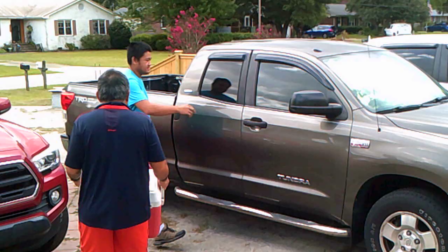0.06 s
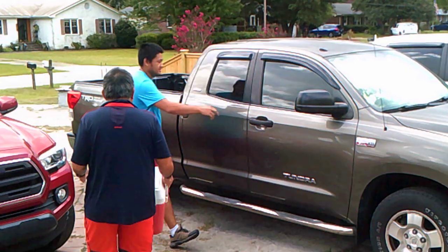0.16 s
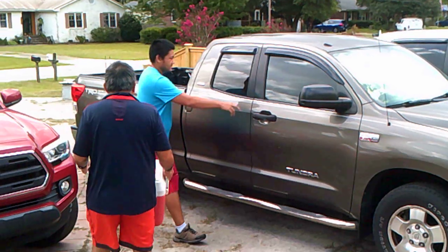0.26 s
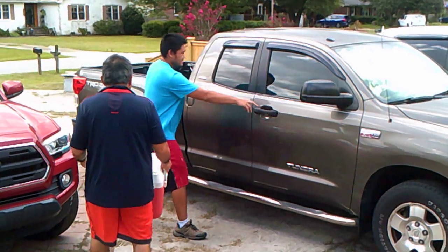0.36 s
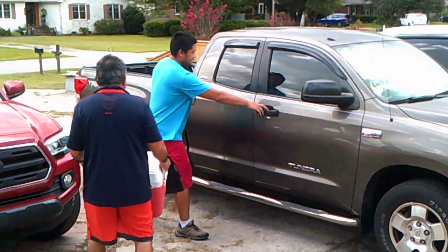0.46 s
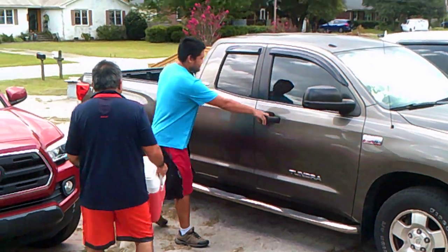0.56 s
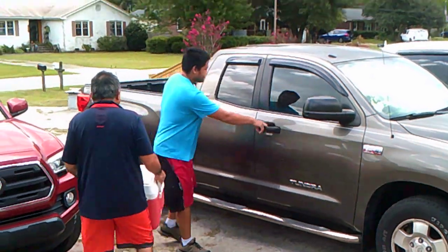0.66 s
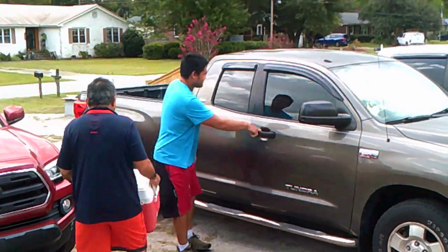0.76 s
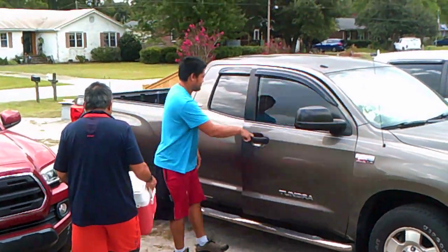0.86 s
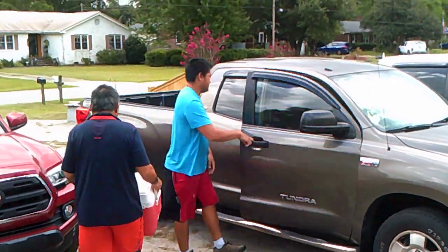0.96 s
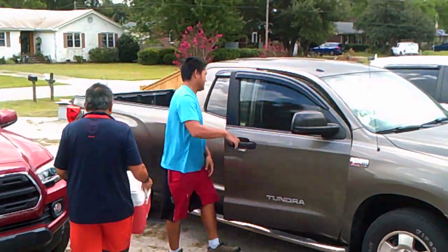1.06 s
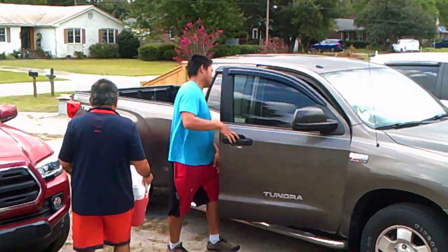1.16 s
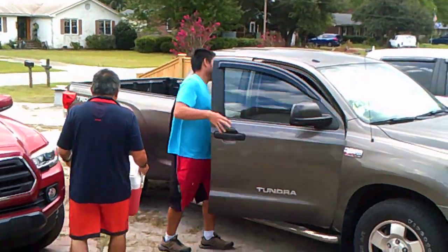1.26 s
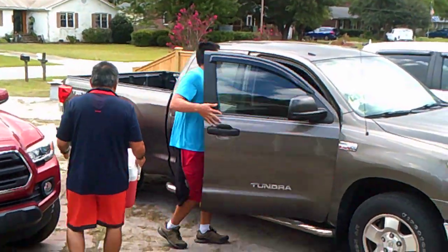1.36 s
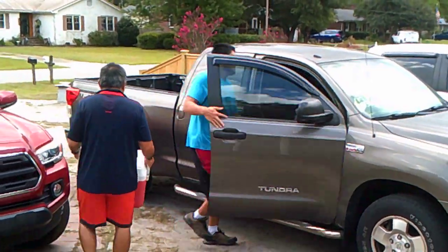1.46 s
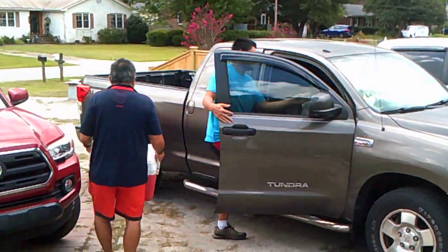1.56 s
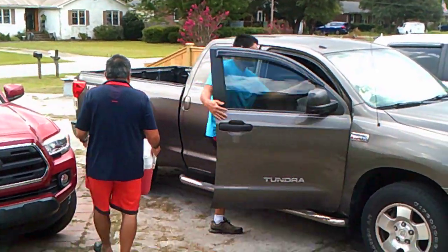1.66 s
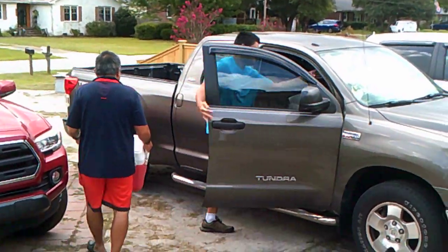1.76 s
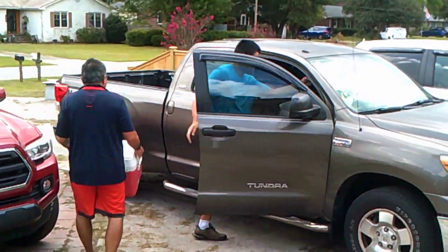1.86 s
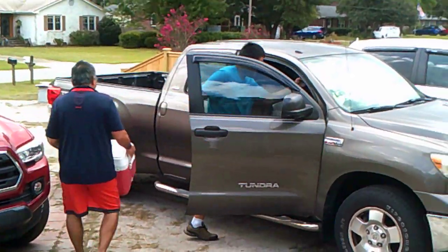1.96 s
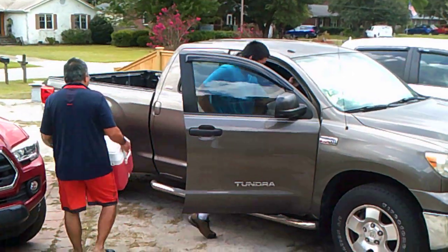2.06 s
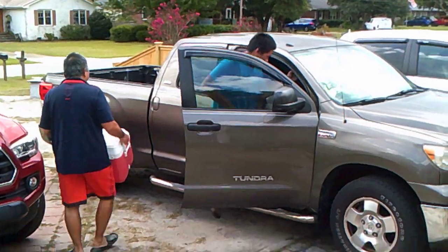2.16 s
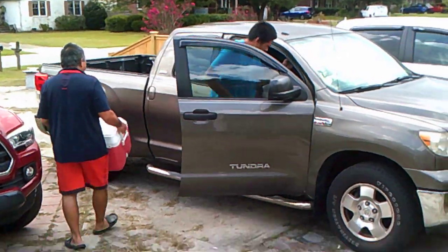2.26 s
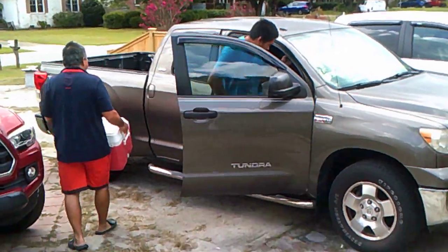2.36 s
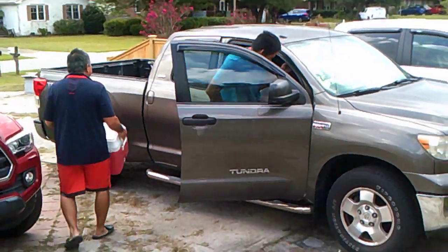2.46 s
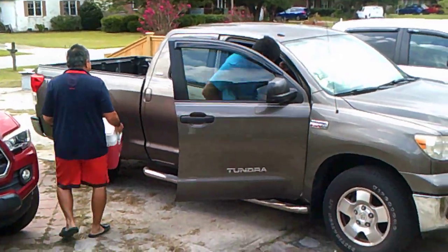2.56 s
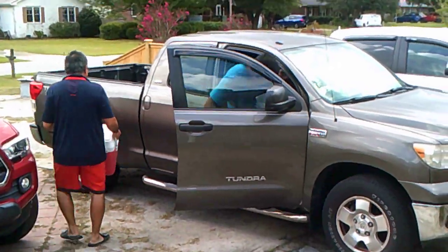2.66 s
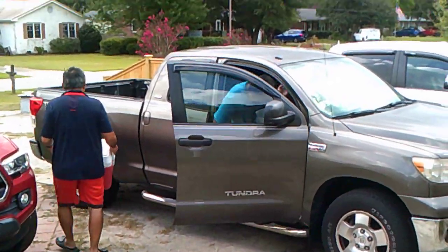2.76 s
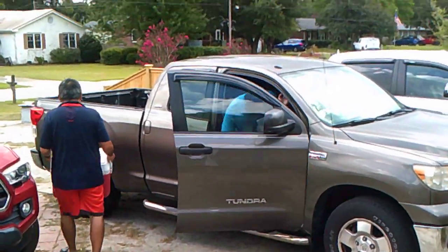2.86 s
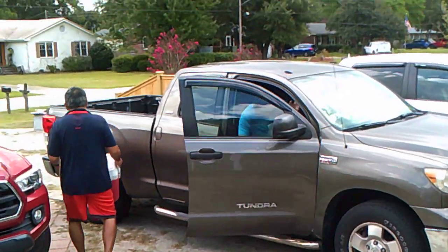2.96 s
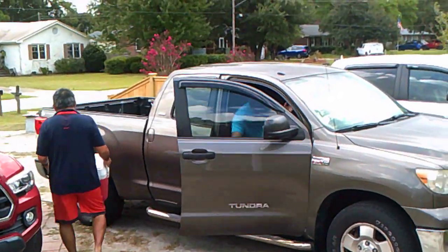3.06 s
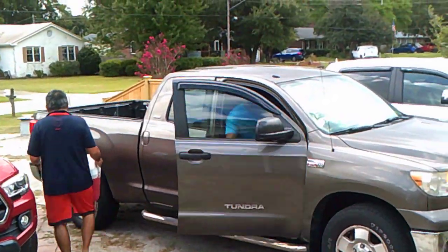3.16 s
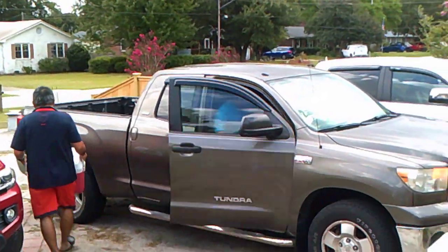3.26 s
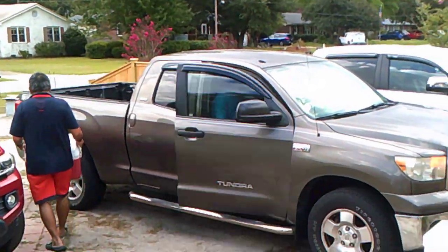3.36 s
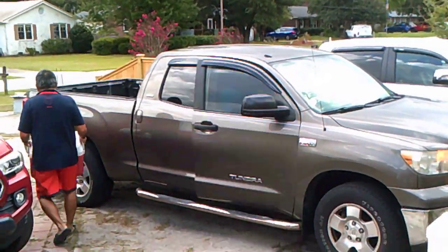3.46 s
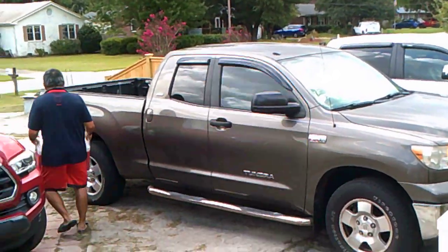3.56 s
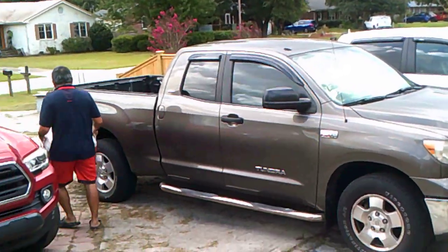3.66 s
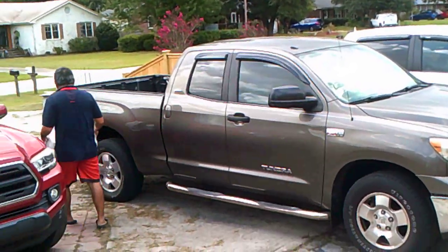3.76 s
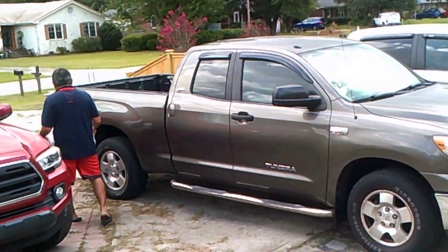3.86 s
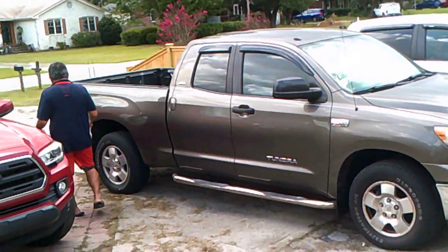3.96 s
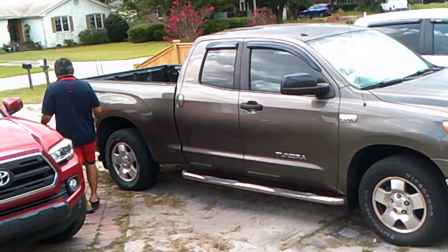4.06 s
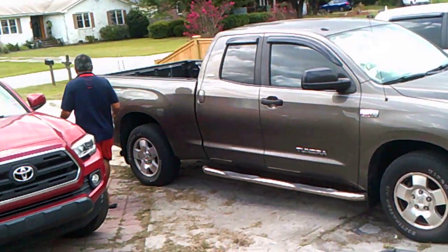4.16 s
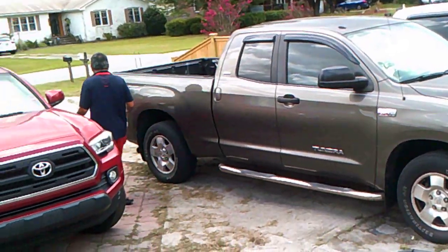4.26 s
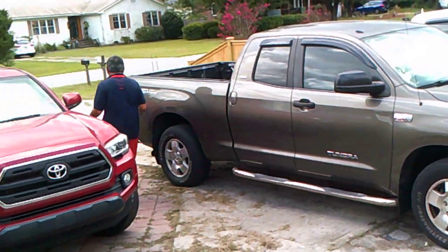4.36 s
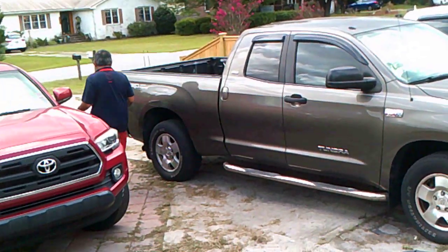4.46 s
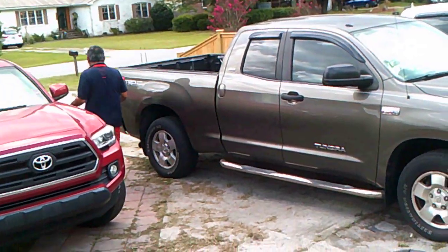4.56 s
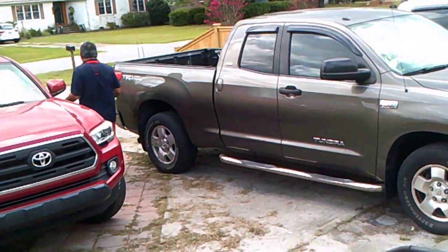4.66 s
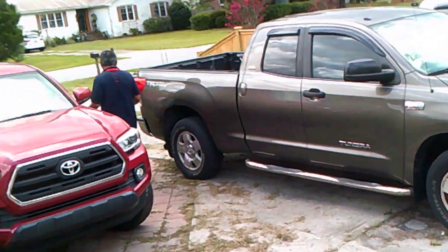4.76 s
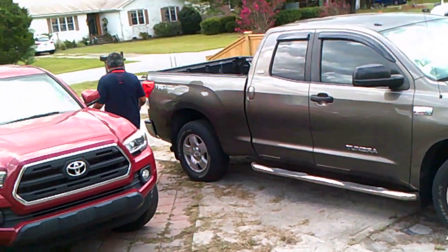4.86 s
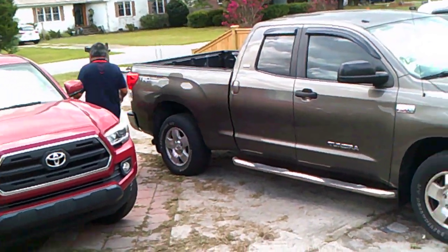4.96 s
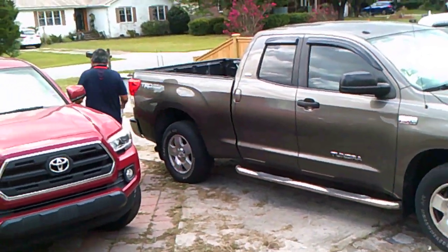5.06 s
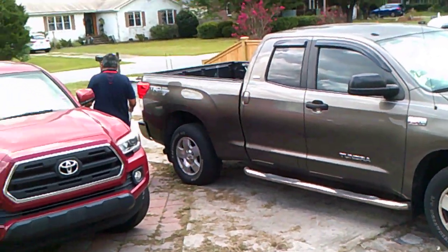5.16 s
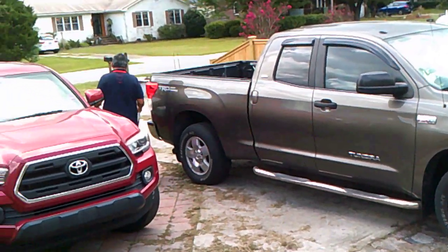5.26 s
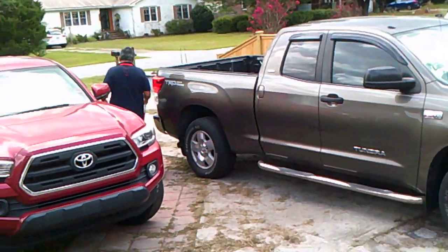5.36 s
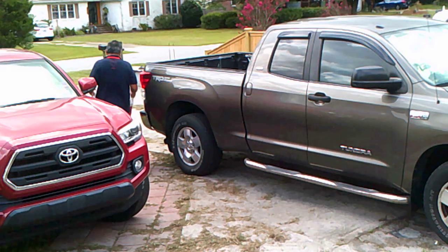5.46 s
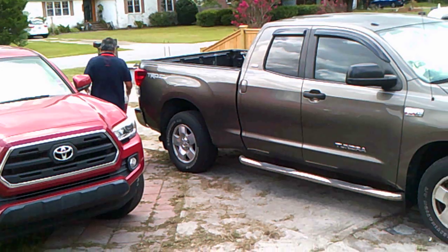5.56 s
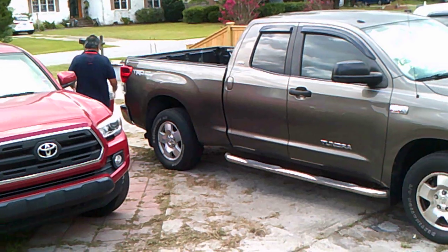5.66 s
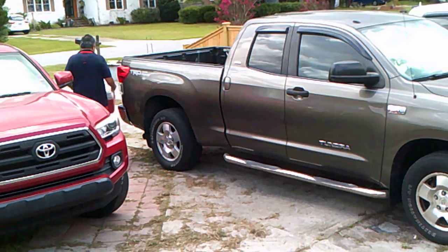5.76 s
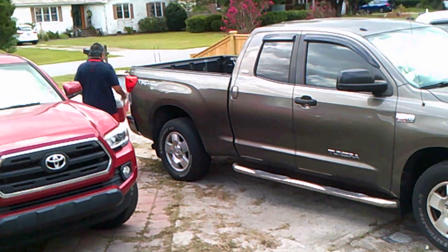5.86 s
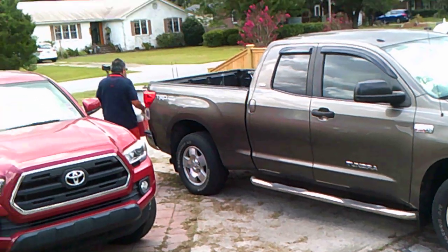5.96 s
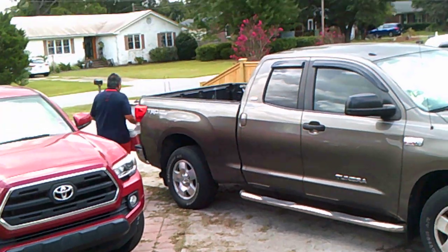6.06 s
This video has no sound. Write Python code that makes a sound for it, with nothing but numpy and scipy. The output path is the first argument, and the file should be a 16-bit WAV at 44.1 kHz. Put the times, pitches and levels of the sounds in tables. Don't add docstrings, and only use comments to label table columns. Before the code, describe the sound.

On an outdoor driveway, a truck's rear door shuts at once with a firm, hollow thump. A handle clacks lightly, then the front latch snaps open, harsh and loud. Small knocks and a bright strap click follow as someone climbs in. A heavy, overloaded slam booms through the cab. Soft scuffs and steady street hiss with insects remain, caught dully by a small camera microphone.

```python
import sys
import numpy as np
from scipy import signal
from scipy.io import wavfile
from scipy.ndimage import uniform_filter1d

SR = 44100
rng = np.random.default_rng(int(sys.argv[2]) if len(sys.argv) > 2 else 0)


def store_pcm(level_fs):
    pcm = np.round(np.clip(level_fs, -1, 1) * 32767).astype(np.int16)
    wavfile.write(sys.argv[1], SR, np.atleast_2d(pcm).T)


def invert_db(x):
    u = np.asarray(x, float) / 20
    return 10 ** u


N = 269451

# start in seconds, peak in dB, treble tilt in dB per octave,
# ring t60 in seconds at 1 kHz, snap of steel on steel in dB.
REAR_KNOCKS = [
    (.085, -14.5, -5, 0.092, -50),
    (.102, -5.5, -2.5, 0.049, -36),
    (.109, -1.5, 1.5, 0.03, -18.5),
    (.113, -19.5, -3.5, 0.062, -26),
    (.131, -8.5, -2.5, 0.15, -48.5),
    (.218, -25, -3, 0.044, -48),
]
HANDLE_KNOCKS = [
    (.636, -22, 1, 0.042, -52),
    (.655, -20, -3.5, 0.05, -52),
    (.6635, -8.5, -0.5, 0.076, -46),
    (.67, -11, -2.5, 0.13, -44.5),
    (.684, -14, 1, .1, -54.5),
    (.705, -19.5, 0, 0.11, -55),
    (.778, -31, -5, .04, -31),
]
LATCH_KNOCKS = [
    (1.1524, 3, 1, 0.05, 2),
    (1.1588, 3, 3.5, 0.05, 2),
    (1.1645, -0.5, 0, 0.1, -7),
    (1.1785, -6, -2.5, .1, -22),
    (1.191, -9.5, 0, 0.18, -51.5),
    (1.208, -19.5, -18, 0.24, -42),
]
SEAT_KNOCKS = [
    (1.965, -17, -2, 0.13, -49),
    (2.405, -15, 2.5, 0.061, -29),
    (2.413, -13.5, 8, 0.036, -28),
    (2.418, -10, 19.5, 0.095, -22.5),
    (2.855, -32, -5, 0.044, -48),
    (2.873, -12.5, 6.5, 0.14, -32),
    (2.888, -16, 9, 0.076, -37),
    (2.9, -20.5, -4, 0.079, -34),
]
SLAM_KNOCKS = [
    (3.502, -12.5, -3.5, .06, -41),
    (3.513, -2.5, -4, 0.11, -31.5),
    (3.525, 2.5, -2.5, 0.089, -7.5),
    (3.543, 5, -0.5, .05, -8.5),
    (3.573, -1.5, -2, 0.06, -12),
    (3.5785, 4, 1.5, 0.04, -6),
    (3.594, -7, -2.5, 0.15, -17.5),
    (3.625, -17.5, -8.5, 0.083, -39),
    (3.647, -15.5, -5, 0.075, -46),
]
# frequency in Hz, density in dB per Hz.
DOOR_SKIN = [(60, -21.5), (200, -8), (400, -11.5), (750, -7), (1100, -5), (1500, -2), (2100, -15.5),
             (3300, -39.5)]
# frequency in Hz, level in dB, t60 in seconds.
DOOR_DRUM = [(147.4, -14, 0.36), (192, -22.5, 0.23), (112, -30, 0.33)]
DOOR_FRAME = [(102.3, -11, 0.5), (264, -14.5, 0.32), (346.5, -12.5, 0.25), (477, -17.5, 0.33)]
LATCH_STEEL = [(3100, -5, .007), (3700, -2, .007), (4200, 0, .006), (4800, -2, .005)]
# frequency in Hz, t60 in seconds.
REAR_AIR = [(20.3, .187), (24.9, .9), (42.3, .355)]
FRONT_AIR = [(23, .153), (31, .325), (43.4, .43)]
# start in seconds, signed pressure on each of the three modes.
REAR_PUSH = [
    (.1008, -1.77, 1.73, .13),
    (.1397, 2.08, -1.62, -.55),
]
FRONT_PUSH = [
    (3.5131, -2.65, 5.3, -.11),
    (3.5551, 9, 2.54, -.75),
]
# start in seconds, level in dB, frequency in Hz, t60 in seconds.
CHECK_STRAP = [(2.418, -35, 481, 2.1)]
# centre in seconds, half length in seconds, level in dB.
SCUFFS = [(.21, .08, -51.5), (0.637, 0.056, -49.5), (0.803, 0.046, -52.5), (0.918, .07, -46.5),
          (2.501, 0.13, -55.5), (2.623, 0.095, -50), (2.818, 0.036, -51.5), (3.726, .035, -50.5),
          (3.963, 0.067, -52), (4.047, 0.047, -49), (4.143, 0.026, -46.5), (4.296, 0.076, -58),
          (5.947, 0.15, -61)]
# frequency in Hz, density in dB per Hz.
GRIT = [(900, -31), (1500, -10.5), (2300, -8), (3050, -18), (3750, -25.5), (4200, -45), (5000, -50.5),
        (5500, -62)]
RUMBLE = [(5.9, -34), (10, -1.5), (21, -4), (36, 1), (46, -7), (70, -16.5), (104, -12.5), (140, -30.5),
          (180, -53), (310, -120)]
STREET = [(60, -12), (90, -4.5), (130, -11), (170, -6), (210, -13.5), (250, -8.5), (360, -18.5), (750, -14),
          (1300, -13), (1800, -14), (2400, -28.5), (3050, -42.5), (4000, -56), (5000, -85)]
# time in seconds, level in dB.
BREEZE = [(0, -23), (1.8, -22), (2.4, -26.5), (3.5, -27), (4.3, -37), (5.7, -36.5), (6.11, -29.5)]
# centre in seconds, half length in seconds, change in dB.
GUSTS = [
    (.37, 0.093, 2.5),
    (.6, .07, -4),
    (.76, 0.054, 6),
    (2.92, .1, 4),
    (3.68, .08, 8),
]
# time in seconds, centre frequency in Hz.
CHORUS = [(0.0, 1746), (0.68, 1613), (1.0, 1570), (1.34, 1542), (1.72, 1658), (3.05, 1678), (3.56, 1580),
          (4.93, 1704), (6.11, 1663)]
# centre in seconds, half length in seconds, rise in dB.
SWELLS = [(.1, 0.078, 4), (.44, 0.12, 1), (.88, 0.15, 6), (2.45, 0.31, 4.5), (2.92, .13, 4.5),
          (3.45, 0.12, 4.5), (4, 0.12, 3.5), (4.8, 0.45, -0.5)]
# frequency in Hz, width in Hz, level in dB, time in seconds when it is uncovered.
MACHINE = [(26.7, 0.62, -37.5, 4.4), (40.3, 0.91, -38, 2.9), (52.94, 0.59, -33, 3.6),
           (904, 3.6, -43.5, 3.4), (248.2, 15, -49, 1.7)]
# frequency in Hz, gain in dB.
SMOOTHING = [(0, 1.5), (1500, 0), (3000, -9.5), (4200, -18.5), (4900, -44), (5300, -57.5), (5800, -44),
             (6600, -26), (7600, -34.5), (8200, -53.5), (8800, -87), (11025, -120), (22050, -120)]

SHUFFLE_DB = -59
STREET_DB, CHORUS_DB = -30, -37.5
SHARED_SWELL = .2
FULL_SCALE, HEADROOM = .707, .712
STEP = 4


def knocks(rows, boom_db, drum=DOOR_DRUM, count=56):
    out = np.zeros(N)
    t = np.arange(SR // 4) / SR
    for s, db, tilt_db, t60, snap_db in rows:
        place, sign = rng.random((2, count))
        hz = 150 + 3100 * ((np.arange(count) + place) / count) ** 1.3
        mode_db = outdoors(DOOR_SKIN, hz) + tilt_db * np.log2(hz / 1000)
        gain = invert_db(mode_db) * np.sign(sign - .5)
        mode_t60 = t60 * (1000 / hz) ** 0.66
        modes = invert_db(-60 * t[:, None] / mode_t60) * np.sin(2 * np.pi * hz * t[:, None])
        skin = modes @ gain
        boom = invert_db(boom_db) * ring(drum, t)
        add(out, s, invert_db(db) * (skin / abs(skin).max() + boom))
        add(out, s, invert_db(snap_db) * ring(LATCH_STEEL, t))
    return out


def cab_air(modes, pushes):
    out = np.zeros(N)
    t = np.arange(SR)[:, None] / SR
    hz, t60 = np.transpose(modes)
    ringing = invert_db(-60 * t / t60) * np.sin(2 * np.pi * hz * t)
    for s, *push in pushes:
        add(out, s, ringing @ push)
    return out


def strap():
    out = np.zeros(N)
    t = np.arange(SR) / SR
    for s, db, hz, t60 in CHECK_STRAP:
        add(out, s, ring([(hz, db, t60)], t))
    return out


def grit():
    grain_db = 2.3 * np.minimum(rng.exponential(1, N // 40 + 1), 4)
    grains = invert_db(grain_db).repeat(40)[:N]
    rustle = noise(GRIT, patchy_db=2, flicker_db=1.5, size=256)
    crackle = evened(rustle * uniform_filter1d(grains, size=30))
    scuffing = bumps([(s, half, invert_db(db)) for s, half, db in SCUFFS])
    return invert_db(9.5) * (invert_db(SHUFFLE_DB) + scuffing) * crackle


def wind_rumble():
    breeze_db = np.interp(np.arange(N) / SR, *np.transpose(BREEZE))
    eddies = noise(RUMBLE, patchy_db=-1.0, flicker_db=3.0, size=4096)
    return invert_db(2.5 + breeze_db + bumps(GUSTS)) * eddies


def insects():
    hz = np.interp(np.arange(N) / SR, *np.transpose(CHORUS))
    throb = invert_db(1.4 * evened(uniform_filter1d(rng.standard_normal(N), size=900)))
    band = resonate(resonate(rng.standard_normal(N), hz, 180), hz, 270)
    return invert_db(CHORUS_DB + bumps(SWELLS)) * evened(band * throb)


def street_hiss():
    hiss = noise(STREET, patchy_db=1.2, flicker_db=0.74, size=1024)
    return invert_db(STREET_DB + SHARED_SWELL * bumps(SWELLS)) * hiss


def machine():
    t = np.arange(N) / SR
    out = np.zeros(N)
    for hz, width, db, s in MACHINE:
        line = evened(resonate(rng.standard_normal(N), hz, width))
        out += invert_db(db) * np.clip((t - s) / .3, .25, 1) * line
    return out


def ring(modes, t):
    return sum(invert_db(db - 60 * t / t60) * np.sin(2 * np.pi * hz * t) for hz, db, t60 in modes)


def resonate(x, hz, width):
    turn = np.exp(2j * np.pi * np.cumsum(hz * np.ones(len(x))) / SR)
    r = np.exp(-np.pi * width / SR)
    smooth = signal.lfilter([1 - r], [1, -r], x / turn + 1e-18)
    return 2 * (turn * smooth).real


def noise(points, patchy_db, flicker_db, size=2048):
    frames, hz = 4 * N // size + 5, np.fft.rfftfreq(size, 1 / SR)
    a, b, patches = rng.standard_normal((frames, len(hz), 3)).T
    patches = uniform_filter1d(patches, size=size // 128, axis=0)
    patches = evened(uniform_filter1d(patches, size=6, axis=1))
    flicker = flicker_db * rng.standard_normal(frames)
    db = outdoors(points, hz)[:, None] + patchy_db * patches + flicker
    spectra = (a + 1j * b) * invert_db(db)
    return evened(signal.istft(spectra, nperseg=size, noverlap=3 * size // 4)[1][:N])


def outdoors(points, hz):
    f, value = np.transpose(points)
    db = np.interp(np.log(hz + 1), np.log(f + 1), value)
    return db - np.maximum(np.interp(hz, *np.transpose(SMOOTHING)), -30)


def bumps(rows):
    t = np.arange(N) / SR
    return sum(height * np.exp(-((t - s) / half) ** 2) for s, half, height in rows)


def evened(x):
    return x / np.sqrt(np.mean(x ** 2) + 1e-20)


def add(mix, s, sound):
    part = mix[round(s * SR):][:len(sound)]
    part += sound[:len(part)]


def scene():
    doors = knocks(REAR_KNOCKS, boom_db=5) + cab_air(REAR_AIR, REAR_PUSH)
    doors += knocks(HANDLE_KNOCKS, boom_db=-3.5)
    doors += knocks(LATCH_KNOCKS, boom_db=-8.5)
    doors += knocks(SEAT_KNOCKS, boom_db=-23.0) + strap()
    doors += knocks(SLAM_KNOCKS, boom_db=-4.0, drum=DOOR_FRAME) + cab_air(FRONT_AIR, FRONT_PUSH)
    floor = grit() + wind_rumble() + insects() + street_hiss() + machine()
    return (doors + floor)[None]


def low_pass(x):
    return signal.sosfilt(signal.butter(12, 15750, fs=SR, output="sos"), x)


def record(dry):
    slow = signal.resample_poly(dry, up=1, down=STEP, axis=1)
    spaced = np.zeros_like(dry)
    spaced[:, ::STEP] = STEP * np.clip(slow, -FULL_SCALE, FULL_SCALE)
    hz = np.linspace(0, SR / 2, num=257)
    gain = invert_db(np.interp(hz, *np.transpose(SMOOTHING)))
    smoothing = signal.firwin2(numtaps=161, freq=hz, gain=gain, fs=SR, window=("kaiser", 8))
    smooth = signal.oaconvolve(spaced, smoothing[None] / smoothing.sum(), "same")
    return low_pass(np.clip(smooth, -HEADROOM, HEADROOM))


dry = scene()
out = record(dry)
store_pcm(out)
```